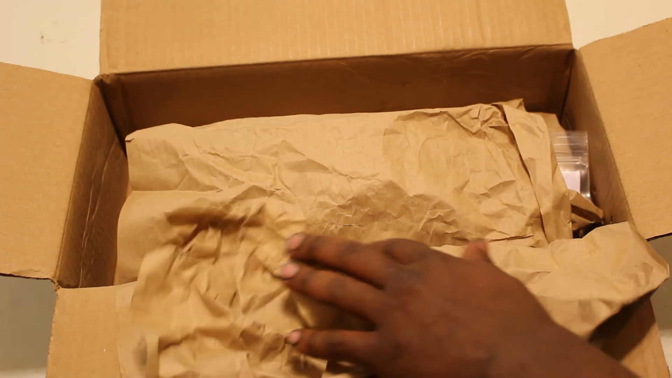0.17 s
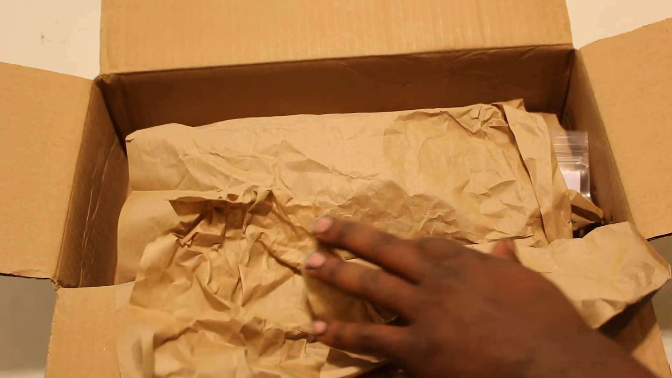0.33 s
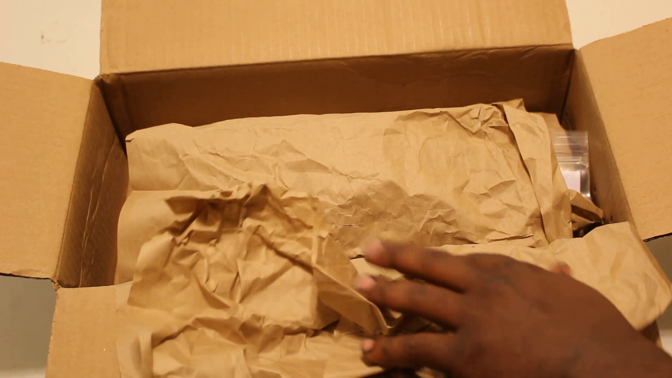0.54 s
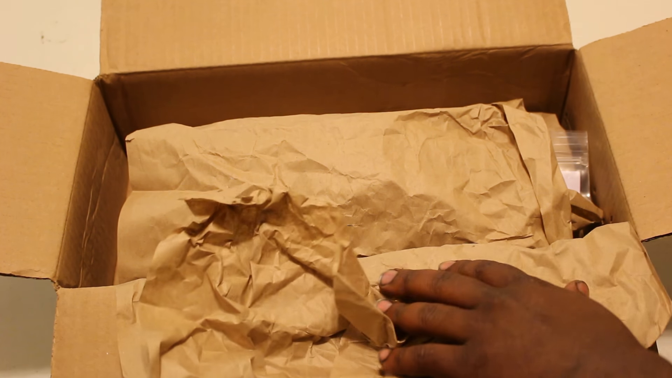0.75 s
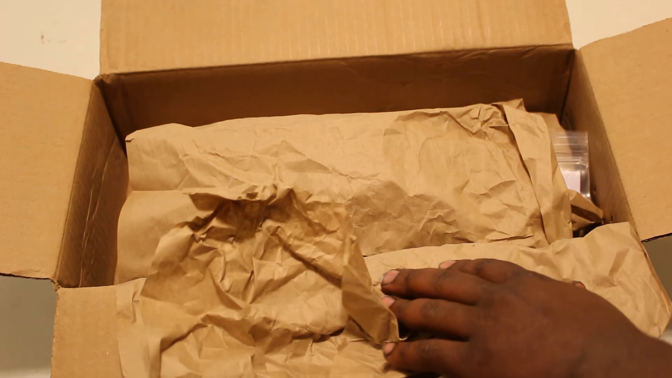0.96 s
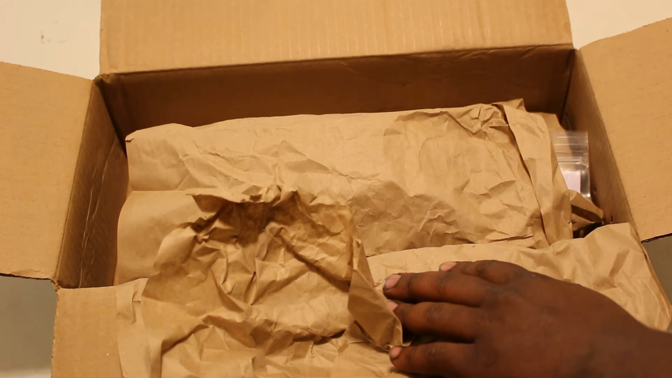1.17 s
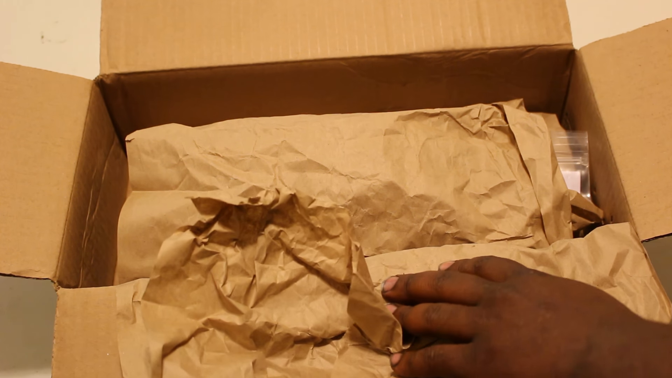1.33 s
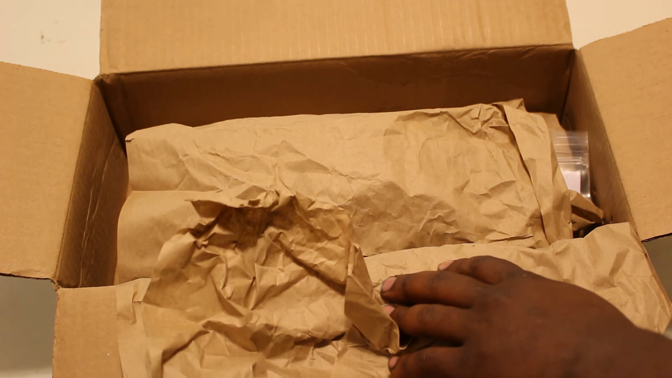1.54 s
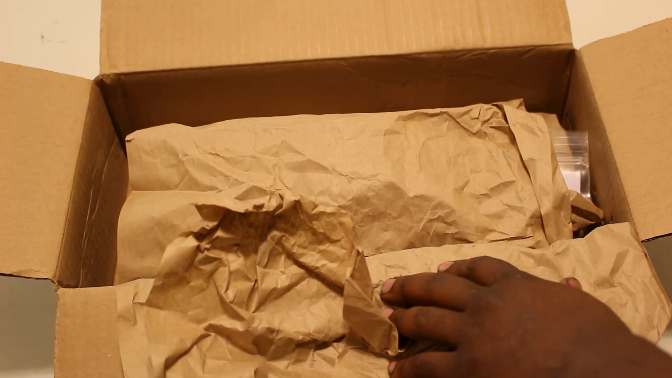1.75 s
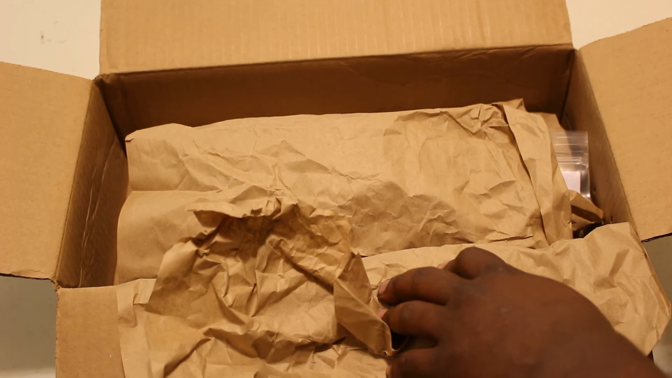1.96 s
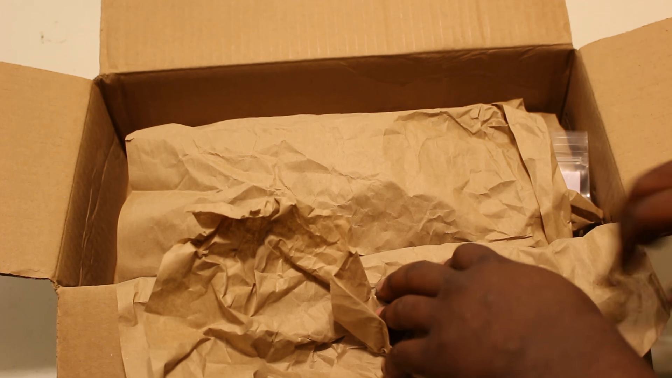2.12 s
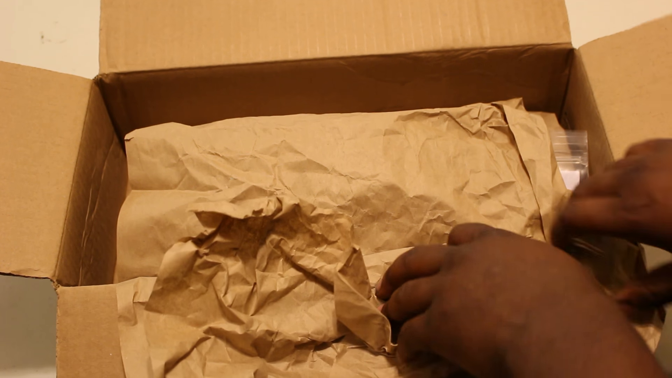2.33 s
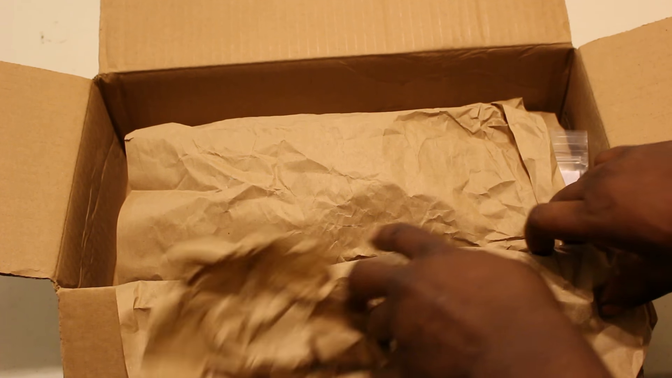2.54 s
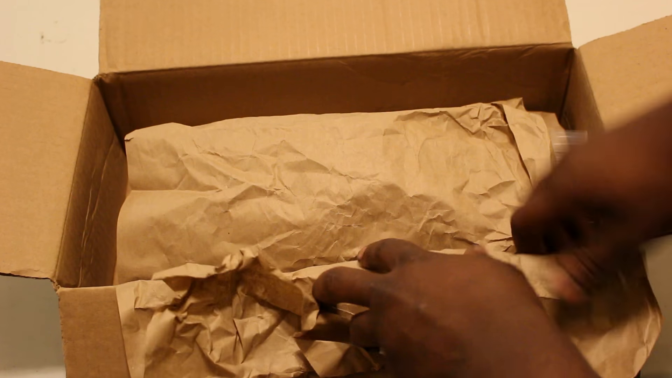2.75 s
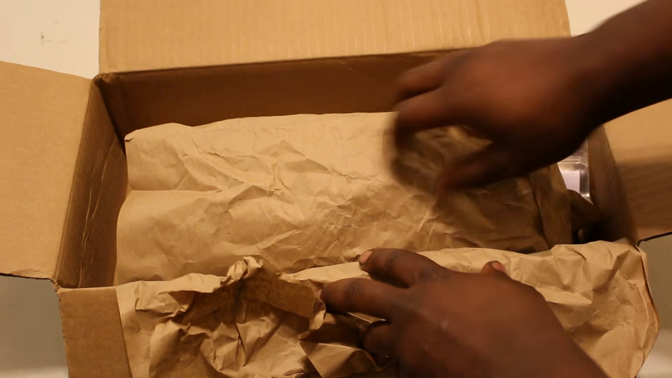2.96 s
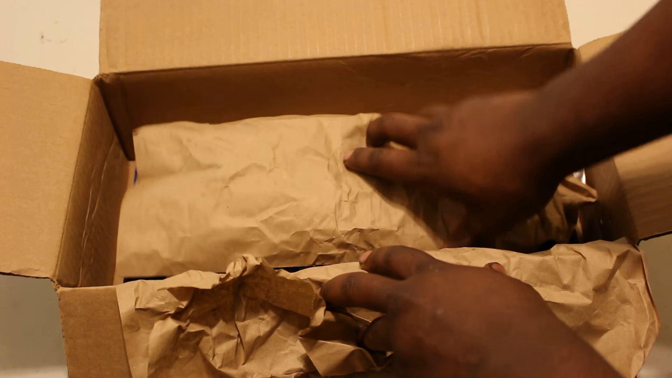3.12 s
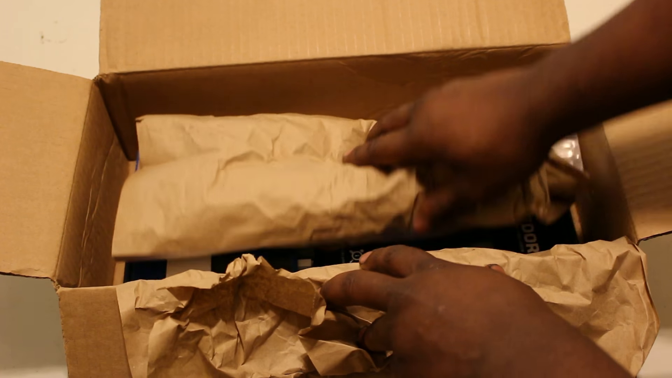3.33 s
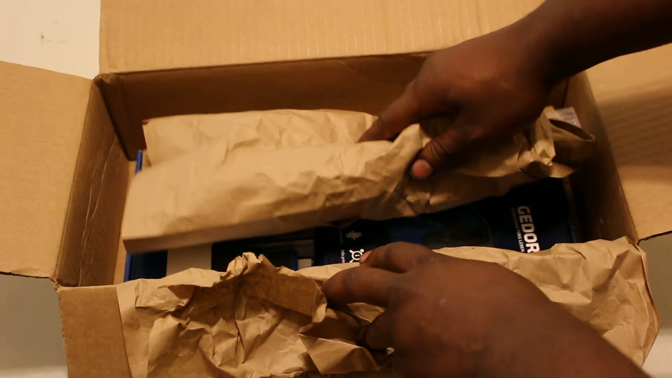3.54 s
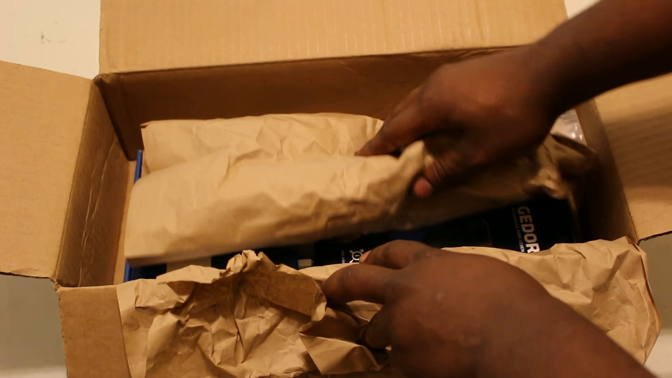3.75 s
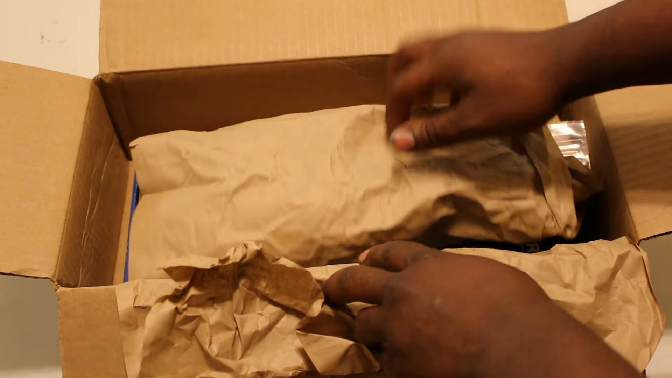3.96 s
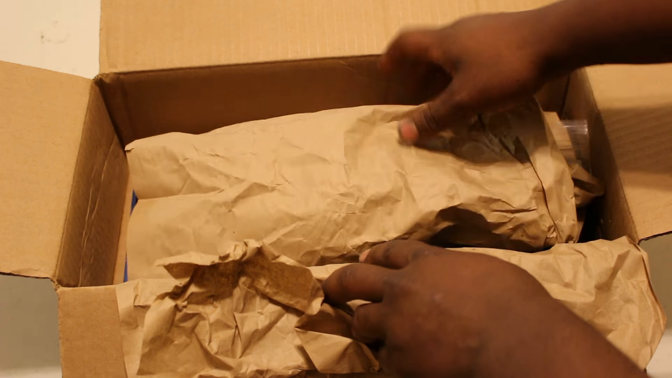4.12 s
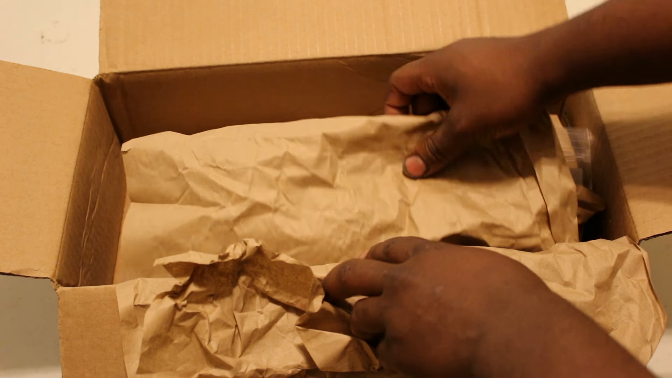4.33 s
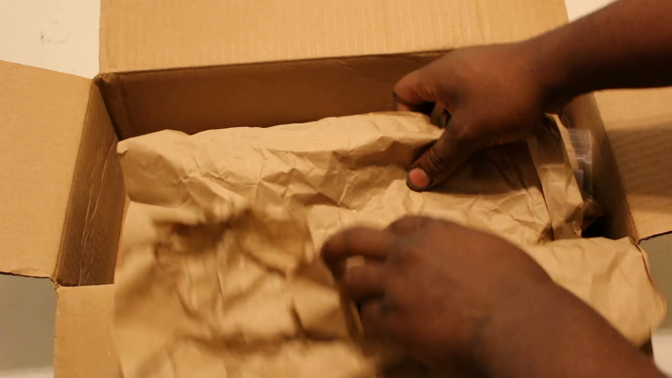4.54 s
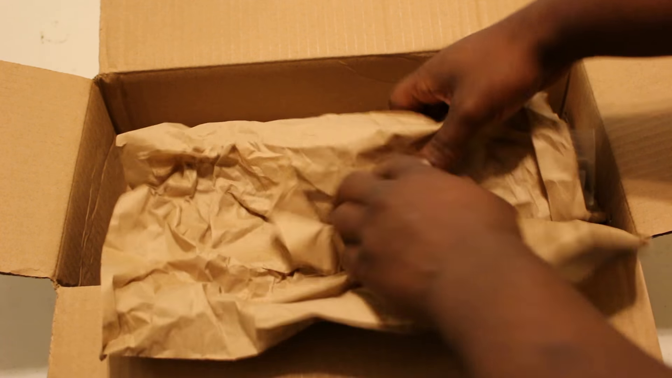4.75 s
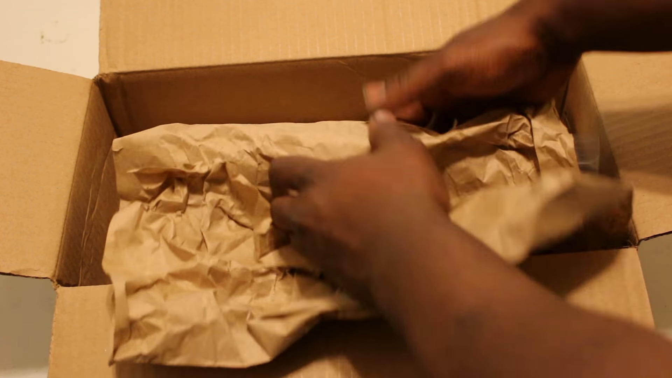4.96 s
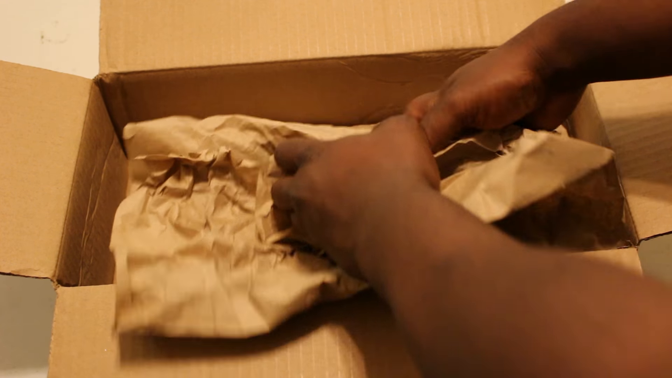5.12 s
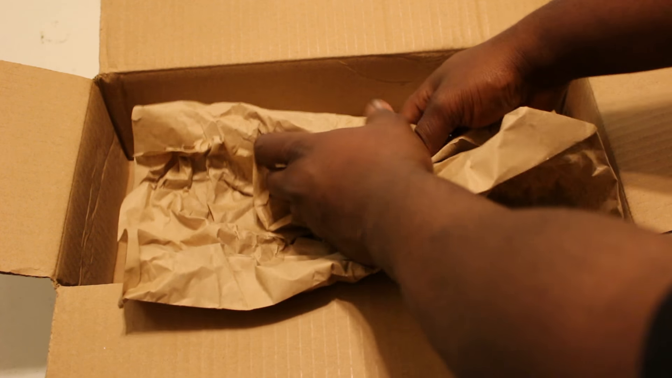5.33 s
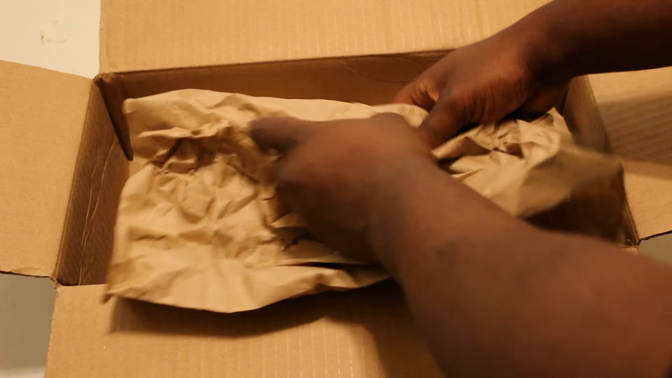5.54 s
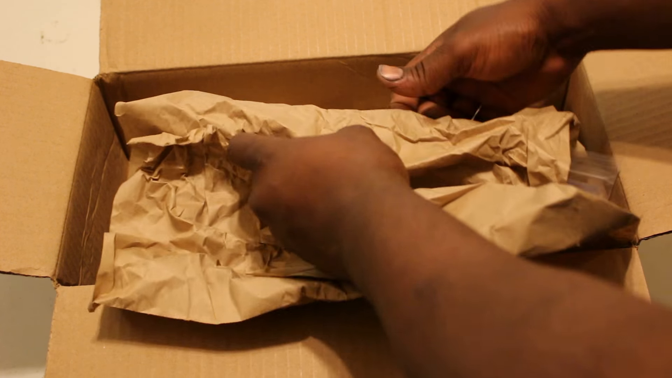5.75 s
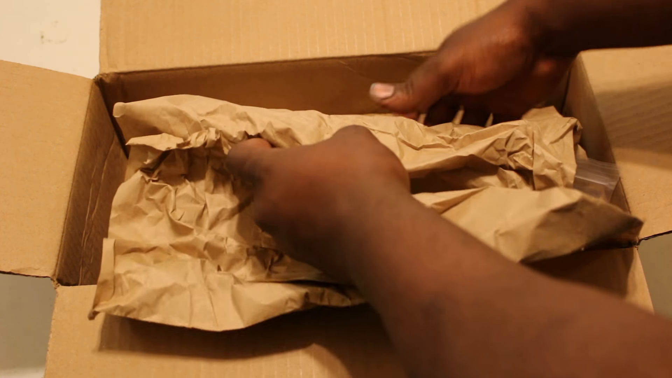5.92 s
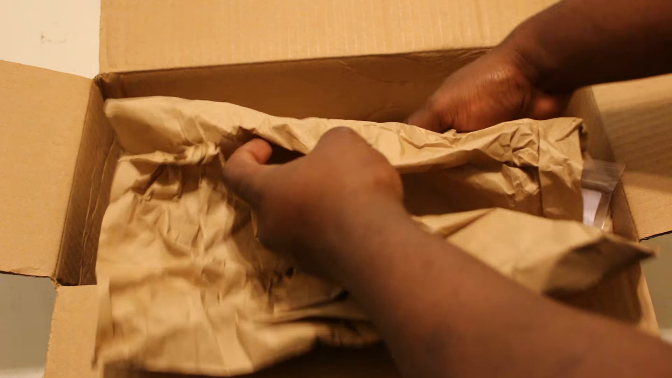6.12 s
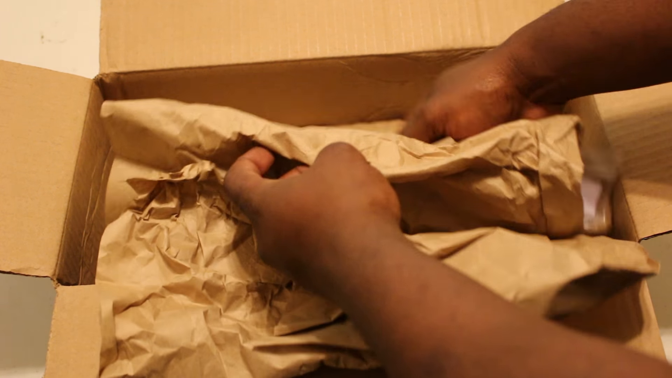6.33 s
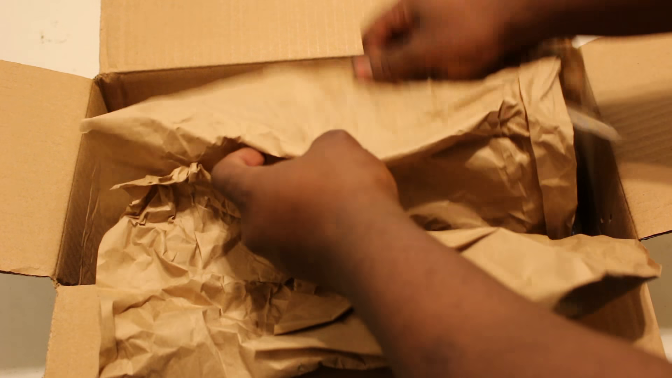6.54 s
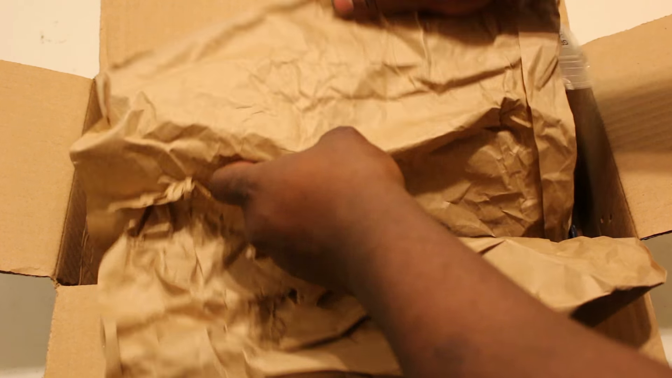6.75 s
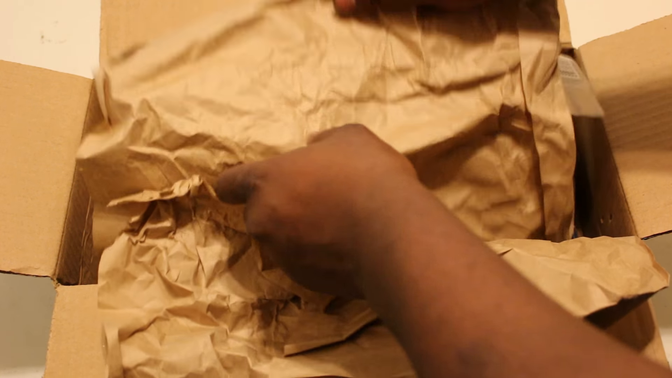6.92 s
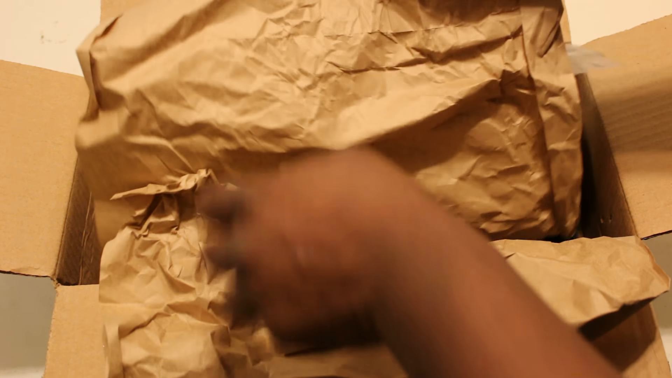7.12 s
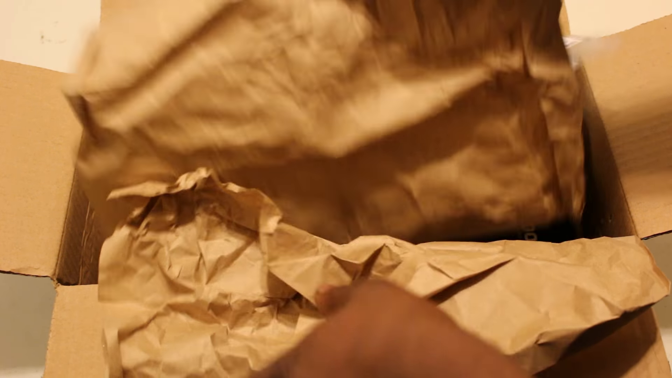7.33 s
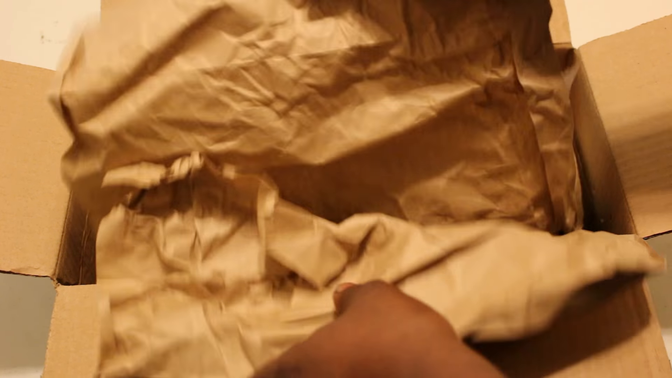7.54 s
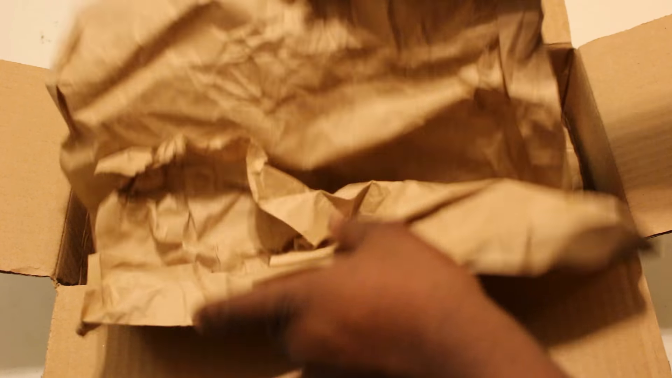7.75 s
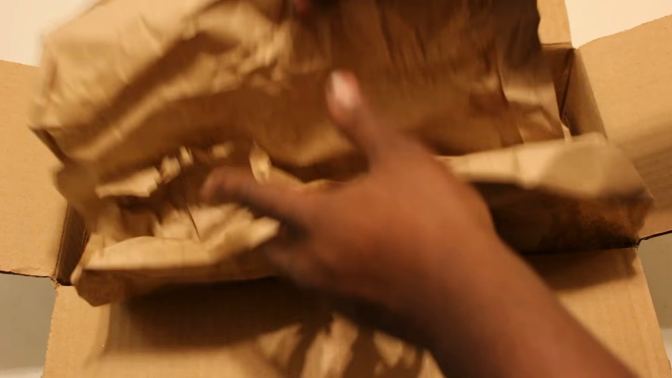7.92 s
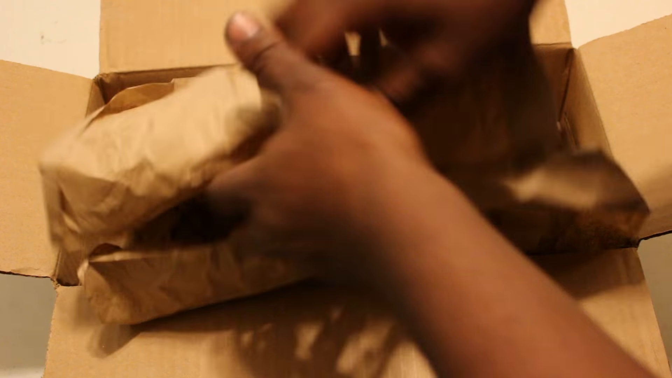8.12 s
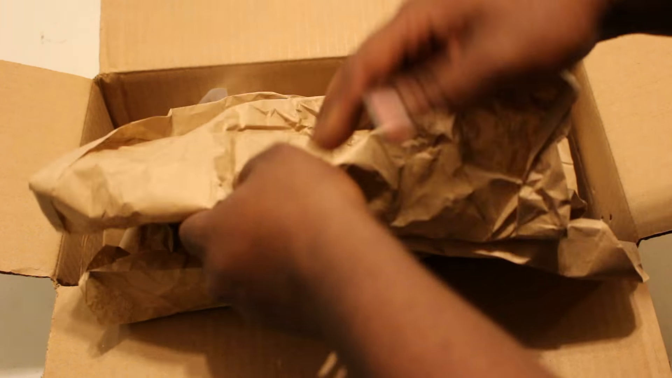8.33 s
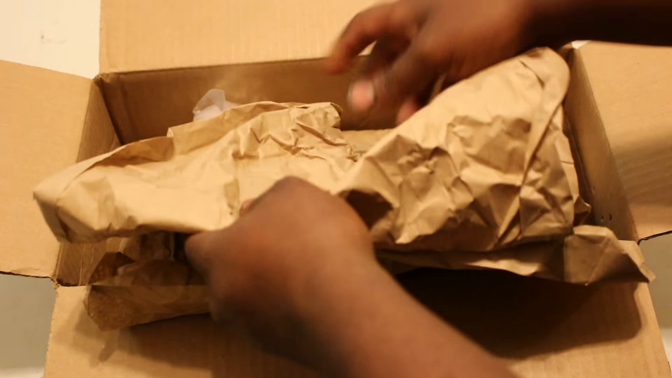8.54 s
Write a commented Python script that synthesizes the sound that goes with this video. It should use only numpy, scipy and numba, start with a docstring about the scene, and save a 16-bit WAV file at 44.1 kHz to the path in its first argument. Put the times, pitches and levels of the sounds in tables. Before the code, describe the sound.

Hands crumple heavy brown paper in a cardboard box: light crinkles, a sudden hollow knock, then dense, bright, snapping rustle to the end.

```python
"""Stiff packing paper is crumpled and pulled by hand in a cardboard box, close to the microphone.
Creases ring the paper facets as damped sines, sliding sheets hiss as noise, and big panels pop low.
Something drops against the box: its modes ring with a thump, the contents rattle and the box scrapes.
Around it a small furnished room adds a diffuse tail, quiet shaped noise and a thin screen whistle."""
import sys
import numpy as np
from scipy import signal
from scipy.fft import rfft, irfft, next_fast_len
from scipy.io import wavfile
from scipy.ndimage import uniform_filter1d
from numba import njit

SR = 44100
rng = np.random.default_rng(int(sys.argv[2]) if len(sys.argv) > 2 else 0)


def persist_wave(psi):
    """Save psi, clipped to +-1, as 16-bit WAV."""
    counts = np.round(np.clip(psi, -1, 1) * 32767).astype(np.int16)
    wavfile.write(sys.argv[1], SR, np.atleast_2d(counts).T)


N = 378378  # length [samples]

# hand strokes on the paper, close to the microphone: (loudest at [s], relative crackle level [dB],
# time to swell 10 dB [s], time to fade 10 dB [s], big panels minus crackle [dB])
STROKES = [(0.0, -37.5, 0.02, 0.04, -6.0), (0.051, -34.0, 0.014, 0.093, -9.0),
           (0.139, -37.0, 0.057, 0.06, -7.0), (0.248, -39.0, 0.019, 0.076, -5.5),
           (0.4, -46.0, 0.062, 0.09, -5.0), (0.46, -35.0, 0.008, 0.075, -5.0),
           (0.53, -37.0, 0.048, 0.104, -6.5), (0.642, -31, 0.008, 0.08, -8),
           (0.818, -48.0, 0.107, 0.062, -4.0), (0.99, -45.5, 0.004, 0.051, -4.5),
           (1.067, -50.0, 0.017, 0.095, -5.0), (1.191, -50.0, 0.076, 0.081, -3.5),
           (1.337, -49.0, 0.026, 0.12, -1.5), (1.84, -48, 0.07, 0.082, -4.0),
           (1.918, -46, 0.006, 0.09, -4.5), (2.312, -36, 0.008, 0.06, -4.5), (2.36, -33, 0.03, 0.09, -5),
           (2.481, -38.0, 0.085, 0.063, -4.0), (2.562, -35.5, 0.05, 0.062, -5.5),
           (2.649, -27.0, 0.063, 0.08, -9.5), (2.772, -36.0, 0.067, 0.054, -5.5),
           (2.859, -35.5, 0.014, 0.08, -7.0), (2.98, -37.5, 0.006, 0.06, -7.5),
           (3.084, -26.0, 0.025, 0.065, -5.0), (3.173, -31.5, 0.054, 0.12, -4.0),
           (3.321, -28.0, 0.126, 0.133, -5.0), (3.455, -31.5, 0.099, 0.109, -1.0),
           (3.556, -28.5, 0.129, 0.111, -5.0), (3.705, -38.0, 0.089, 0.12, -6.0),
           (3.848, -34.0, 0.021, 0.127, -5.5), (3.981, -32.0, 0.11, 0.144, -3.5),
           (4.147, -38.5, 0.107, 0.05, 1.5), (4.243, -32.5, 0.009, 0.091, -4.0),
           (4.35, -31.5, 0.023, 0.223, -3.0), (4.599, -31.5, 0.177, 0.228, -5.5),
           (4.918, -27.0, 0.15, 0.073, -5.5), (4.995, -26.5, 0.074, 0.195, -5.5),
           (5.273, -23.5, 0.169, 0.177, -6.5), (5.517, -27.0, 0.134, 0.128, -5.5),
           (5.654, -28.0, 0.101, 0.105, -5.0), (5.771, -28.0, 0.082, 0.064, -5.0),
           (5.856, -33.5, 0.023, 0.093, -4.0), (5.92, -34.0, 0.058, 0.065, -3.5),
           (6.065, -34.5, 0.066, 0.055, -4.5), (6.13, -30.5, 0.073, 0.083, -6.0),
           (6.228, -27.5, 0.08, 0.157, -7.0), (6.473, -25.0, 0.113, 0.185, -7.0),
           (6.663, -31.5, 0.141, 0.078, -6.0), (6.806, -34.0, 0.067, 0.078, -5.0),
           (6.877, -32.0, 0.078, 0.071, -6.0), (7.006, -32.5, 0.067, 0.073, -5.5),
           (7.113, -35.5, 0.014, 0.1, -5.0), (7.277, -34.0, 0.105, 0.109, -5.5),
           (7.439, -29.5, 0.105, 0.13, -6.0), (7.596, -29.0, 0.127, 0.153, -6.5),
           (7.781, -29.0, 0.132, 0.124, -4.5), (7.936, -30.0, 0.095, 0.157, -5.0),
           (8.18, -33, 0.16, 0.1, -6.5), (8.29, -25.5, 0.1, 0.13, -7.0), (8.399, -33.5, 0.086, 0.135, -7.5),
           (8.576, -33.0, 0.115, 0.1, -6.5)]
# the sheet settling under resting hands: (relative crackle level [dB], big panels minus crackle [dB])
REST = (-62.5, 3.7)
# treble of the rustle, rising and falling: (time [s], level [dB])
TREBLE = [(0, 0), (.9, 6), (2.1, 4), (2.6, 2), (3.1, 0), (3.6, 3), (4.3, 3), (4.6, 3), (4.77, -4), (4.9, 3),
          (5.3, 0.5), (5.9, 1), (6.55, 5), (7.2, 2), (8.58, 3)]
FINE_DB = 4.4  # fine creases minus crackle, for a stroke at 0 dB
FINE_PER_DB = 0.4  # how much brighter each dB of pull makes the fine creases [dB]


def rustle():
    """Random creases over sliding hiss; each stroke moves its own mix of big panels and fine creases."""
    t = np.arange(0, N / SR + .001, .001)  # control times, 1 ms apart [s]
    clock = np.arange(N) / SR
    moves = [(REST[0] + 0 * t, REST[1])]
    moves += [(swell(t, *row[:4]), row[4]) for row in STROKES]
    mid_power = sum(undb(db) ** 2 for db, _ in moves)
    panel_power = sum(undb(db + panel_db) ** 2 for db, panel_db in moves)
    # strong pulls snap finer creases, so loud strokes are brighter
    fine_power = sum(undb(db + FINE_DB + FINE_PER_DB * db) ** 2 for db, _ in moves)
    mid_gain, panel_gain, fine_gain = (
        np.interp(clock, t, np.sqrt(power)) for power in (mid_power, panel_power, fine_power))
    fine_gain = fine_gain * undb(np.interp(clock, *np.transpose(TREBLE)))

    slide = noise(PAPER) * undb(1.75 * walk(60))  # sheets catch and let go
    panels = crackle(count=1800, spread_db=3.2, cycles=12, lo_hz=180, hi_hz=900)
    panels += level(band(slide, 180, 900), -1)
    creases = crackle(count=11000, spread_db=3.9, cycles=11, lo_hz=800, hi_hz=15000)
    creases += level(band(slide, 800, 16000), -2.2)
    fine = high_pass(creases, 5500)
    mix = undb(-1.35) * panel_gain * panels
    mix += undb(-2.5) * mid_gain * (creases - fine) + fine_gain * fine
    return np.interp(clock, t, hush(t)) * mix


# spectrum of the paper: (frequency [Hz], level per Hz [dB])
PAPER = [(150, -30), (224, -21), (365, 0.5), (595, 5.5), (784, 1), (1650, -4), (5770, -11.5),
         (10500, -20.5), (16000, -32)]


def crackle(count, spread_db, cycles, lo_hz, hi_hz):
    """Each crease rings four facets around a pitch of its own; sizes have a long tail, so a few stand out."""
    when, luck, side, pitch = rng.random((4, count, 1))
    detune, late = rng.random((2, count, 4))
    hz = lo_hz * (hi_hz / lo_hz) ** (0.548 * pitch + 0.4496 * detune)
    size_db = -spread_db * np.log(1 - .99 * luck) + shape(PAPER, hz)
    size = undb(size_db) * hz ** 0.57 * np.sign(side - .5)
    s = when * (N / SR - .01) + .0015 * late ** 2
    t60 = cycles * (.5 + late) / hz + 0.00073  # later facets ring longer
    return level(ring(s, hz, t60, size), 0)


# loud creases close to the microphone: (time [s], relative level [dB], facet pitch [Hz],
# bright edge relative to that level [dB])
SNAPS = [(0.045, -14, 3020, -14), (0.0605, -10.5, 3000, -20), (0.127, -22, 1220, -29),
         (0.251, -20.5, 1480, -13), (0.458, -14, 1560, -12), (0.521, -17, 2900, -33),
         (0.588, -18, 2380, -22), (0.633, -10.5, 1120, -25), (0.648, -11.5, 3460, -13),
         (0.656, -11.5, 1380, -23), (0.9887, -24, 1400, -21), (1.0694, -33, 1350, -17),
         (1.341, -26.5, 940, -30), (1.709, -39, 4370, -4), (1.795, -27.5, 880, -17),
         (1.844, -29, 1520, -28), (1.9182, -22.5, 2280, -18), (1.945, -27, 2760, -22),
         (2.3014, -22.5, 2590, -23), (2.318, -13, 2430, -20), (2.355, -12, 1110, -32),
         (2.488, -17.5, 2400, -27), (2.553, -11, 3800, -22), (2.611, -12, 3500, -14),
         (2.615, -16, 1300, -13), (2.678, -14, 1420, -6), (2.8914, -11.5, 2100, -31),
         (2.9775, -12, 2240, -30), (3.059, -18.5, 1910, -10), (3.0729, -8.5, 2500, -15),
         (3.0877, -16, 2050, -1), (3.165, -24, 1180, -2), (3.254, -14, 1620, -18), (3.276, -10, 2000, -30),
         (3.435, -14, 3530, -17), (3.472, -10.5, 4600, -7), (3.538, -15, 3370, -28),
         (3.551, -11, 1950, -24), (3.563, -15.5, 1310, -4), (3.62, -7.5, 4960, -12),
         (3.7359, -12, 3460, -25), (3.767, -20, 3800, -18), (3.825, -26, 5000, -6), (3.8442, -5, 3800, -36),
         (3.972, -15, 4130, -11), (4.239, -13, 3400, -19), (4.2548, -18, 1880, -24),
         (4.347, -17.5, 1370, -5), (4.4203, -15, 1080, -18), (4.827, -10, 3030, -25),
         (4.8835, -9.5, 1290, -24.5), (4.9113, -7.5, 1250, -8.5), (4.9595, -12, 1000, -18),
         (5.018, -9, 4000, -9), (5.057, -15, 1820, -14), (5.095, -12, 2290, -8), (5.25, -9, 1740, -23),
         (5.431, -19, 2330, -28), (5.479, -14, 1170, -29), (5.4993, -8, 1120, -33.5),
         (5.657, -5, 2580, -25), (5.686, -19, 1680, -6), (5.859, -19, 1240, -21.5),
         (5.9195, -13.5, 1900, -26), (6.2224, -13, 1680, -5), (6.2828, -16.5, 1480, -6),
         (6.3184, -15, 1820, -10), (6.4136, -16.5, 875, -6), (6.4621, -8, 1380, -25), (6.573, -20, 1500, 1),
         (6.8728, -13.5, 2940, -18), (7.113, -19.5, 1440, -24.5), (7.522, -10.5, 3100, -7),
         (7.586, -19, 1100, -25), (7.693, -12.5, 2760, -30), (7.769, -19, 1160, -30),
         (7.9182, -16.5, 1490, -17), (8.0465, -11, 3040, -10), (8.108, -11.5, 2830, -8),
         (8.1727, -14, 1710, -5), (8.2315, -10.5, 2300, -14), (8.2612, -8, 2800, -24),
         (8.2881, -7, 1820, -25), (8.36, -19, 5500, -7), (8.3926, -12, 3100, -23), (8.4482, -21, 2500, -25)]


def snaps():
    """Loud creases: a facet rings, a bright edge clicks, then neighbours give way in a dying run."""
    s, db, hz, edge_db = np.transpose(SNAPS)
    facet = ring(s, hz, 9 / hz, undb(db - 4.0))
    edge = bursts(s, undb(db + edge_db - 2.5), 0.01) * level(band(noise(PAPER), 3300, 15000), 0)

    delay, detune, size = rng.standard_normal((3, len(s), 16))  # 16 neighbours per crease
    late = .002 * delay ** 2
    near_hz = hz[:, None] * 2 ** (0.47 + 0.594 * detune)
    near_db = db[:, None] - 12 - 1000 * late  # 1 dB weaker per ms of delay
    near_db -= 9 * np.log2(np.maximum(near_hz / 4500, 1))  # weaker still above 4500 Hz
    near = ring(s[:, None] + late, near_hz, 11 / near_hz, undb(near_db) * size)
    return facet + edge + near


HUSH_DB, HUSH_S = -0.5, 0.012  # depth per crease [dB], time constant [s]


def hush(t):
    """Gain of the rustle: the sheet tightens and quietens just before a loud crease gives."""
    ahead = np.array(SNAPS)[:, :1] - t
    tension = np.exp(-np.maximum(ahead, 0) / HUSH_S) * (ahead > 0)
    return undb(HUSH_DB * np.sum(tension, axis=0))


# big panels buckling: (start of the give [s], relative level [dB], pitch [Hz])
POPS = [(0.456, -19, 553), (2.298, -30, 342), (3.072, -19.5, 480), (3.221, -15, 500), (3.456, -5.5, 567),
        (3.547, -12, 664), (3.998, -24, 560), (4.033, -22.5, 454), (4.142, -20, 243), (4.415, -17.5, 350),
        (4.907, -17, 420), (4.957, -13, 600), (5.441, -16, 610), (5.628, -15.5, 580), (5.76, -17, 305),
        (6.44, -16, 364), (6.87, -20, 500), (7.587, -16, 510), (8.178, -19.5, 322), (8.271, -16, 290)]


def pops():
    """Large panels flip with a few low cycles, a moment after they start to give."""
    s, db, hz = np.transpose(POPS)
    low = ring(s + 0.0032, hz, 14 / hz, undb(db - 3.0))
    overtone = ring(s + 0.00285, 1.48 * hz, 8 / hz, undb(db - 9.5))
    return low + overtone


# blows on the box: (time [s], relative level [dB], hardness [dB])
BLOWS = [(1.3832, -8, -6), (1.3906, -10.5, -6), (1.4102, -4, -2), (1.415, -13, 1), (1.4248, -10.5, 7),
         (1.4455, -14, -10), (1.595, -25, -16), (1.624, -27, -29)]
# modes of box and contents: (frequency [Hz], level [dB], time to fall 60 dB [s])
BOX = [(107, -20, 0.42), (136, -17.5, 0.25), (183.5, -11.5, 0.14), (220, -12.5, 0.15), (291, -8.5, 0.091),
       (329.5, -0.5, 0.081), (402, -3.5, 0.068), (517, -7.5, 0.066), (657, -8.5, 0.069), (821, -9.5, 0.038),
       (1380, -20, 0.035), (1720, -19, 0.029), (2620, -10, 0.019), (2984, -6, 0.03), (3320, -8.5, 0.033),
       (5630, -18, 0.012)]
# the walls give briefly under each blow: (frequency [Hz], level [dB], time to fall 60 dB [s])
THUD = [(150, -9, 0.042), (426, 7, .012)]
CRACK_DB, CRACK_T60_S = -11, 0.011  # bright crack relative to blow plus hardness, and its decay


def blows():
    """Each blow rings the box modes, the upper ones by its hardness, over a short thud and a bright crack."""
    s, db, hard_db = (column[:, None] for column in np.transpose(BLOWS))
    hz, mode_db, t60 = np.transpose(BOX)
    # low neighbours swing opposite ways; the high modes take a new sign at each blow
    alternate = -(-1) ** np.arange(len(hz))
    side = np.where(hz > 1000, rng.choice([-1, 1], (len(s), len(hz))), alternate)
    upper = np.clip(np.log2(hz / 420), 0, 1)
    modes = ring(s, hz, t60, side * undb(db + mode_db + hard_db * upper))

    thud_hz, thud_db, thud_t60 = np.transpose(THUD)
    thud = ring(s, thud_hz, thud_t60, undb(db + thud_db))
    crack = bursts(s[:, 0], undb(db + hard_db + CRACK_DB)[:, 0], CRACK_T60_S)
    return modes + thud + crack * level(band(noise(PAPER), 2500, 12000), 0)


# contents rattling from the first blow on, then settling: (loudest at [s], relative level [dB],
# time to swell 10 dB [s], time to fade 10 dB [s])
RATTLE = [(1.41, -24, .06, .055), (1.58, -41, 1, .09)]
# spectrum of the rattling hiss: (frequency [Hz], level per Hz [dB])
RATTLE_COLOUR = [(200, 6), (1200, 0.5), (2200, -4), (3100, -3.5), (4100, -9), (5600, -6),
                 (9000, -23.5), (16000, -37)]
SHIFT = 0.028  # share by which the modes move as the contents shift (standard deviation)


def rattle():
    """Tumbling contents knock the box modes with new weights and pitches each time, over a rattling hiss."""
    first = BLOWS[0][0]
    hz, mode_db, t60 = np.transpose(BOX)
    knocks = first + rng.uniform(0, .34, (90, 1))
    knock_db = np.maximum(*(swell(knocks, *row) for row in RATTLE)) + 2.0 + mode_db
    knock_db = knock_db - 1.3 * (hz < 250) - 4 * (hz > 1000)
    detune, weight = rng.standard_normal((2, len(knocks), len(hz)))
    tumble = ring(knocks, hz * (1 + SHIFT * detune), t60, undb(knock_db) * weight)

    t = np.arange(N) / SR
    hiss_gain = sum(undb(swell(t, *row)) for row in RATTLE) * (t > first)
    return tumble + hiss_gain * noise(RATTLE_COLOUR)


# the box shoved over the table: (loudest at [s], relative level [dB],
# time to swell 10 dB [s], time to fade 10 dB [s])
SCRAPE = [(.714, -36, .008, .08), (.79, -37, .08, .055)]


def scrape():
    """Box sliding on the table: random stick-slip kicks, about 3000 a second, kept to the low band."""
    t = np.arange(N) / SR
    kicks = rng.standard_normal(N) * (rng.random(N) < 3000 / SR)
    return sum(undb(swell(t, *row)) for row in SCRAPE) * level(band(kicks, 83, 290), 0)


def box():
    """Everything the cardboard box sounds, without its deepest bass."""
    return high_pass(blows() + rattle() + scrape(), 80)


def walls(x, t60=.25, wet_db=-13):
    """Small furnished room: a diffuse tail of decaying noise, starting 4 ms after the direct sound."""
    t = np.arange(int(.5 * SR)) / SR
    tail = band(rng.standard_normal(len(t)), 46, 6000) * np.exp(-np.log(1000) * t / t60) * (t > .004)
    tail /= np.sqrt(np.sum(tail ** 2))
    return x + undb(wet_db) * signal.fftconvolve(x, tail)[:N]


# spectrum of the quiet room: (frequency [Hz], level per Hz [dB])
ROOM = [(25, -4), (112, -4.5), (265, -8), (366, -4), (644, -14), (798, -11.5), (2600, -22), (13700, -35),
        (15300, -51)]


def room_tone():
    """The quiet room: steady noise, strongest in the bass."""
    return level(noise(ROOM), -51)


# thin screen whistle: (frequency [Hz], rms level ahead of the microphone chain [dB])
WHISTLE = [(15734, -74)]


def whistle():
    """The screen's whistle: a steady, very high sine."""
    t = np.arange(N) / SR
    return sum(undb(db) * np.sqrt(2) * np.sin(2 * np.pi * hz * t) for hz, db in WHISTLE)


def undb(db):
    """Decibels to gain."""
    return 10 ** (np.asarray(db) / 20)


def level(x, db):
    """Scale to an rms level."""
    return x * undb(db) / np.sqrt(np.mean(x ** 2))


def shape(table, hz):
    """dB of a spectrum at the given frequencies, interpolated over log frequency."""
    f, db = np.transpose(table)
    return np.interp(np.log(np.maximum(hz, 1)), np.log(f), db)


def noise(table):
    """Noise with the given spectrum, rms 1."""
    size = next_fast_len(N)
    gain = undb(shape(table, np.arange(size // 2 + 1) * SR / size))
    return level(irfft(rfft(rng.standard_normal(size)) * gain, size)[:N], 0)


def band(x, lo_hz, hi_hz):
    """Band-pass."""
    return signal.sosfilt(signal.butter(2, [lo_hz, hi_hz], "bandpass", fs=SR, output="sos"), x)


def high_pass(x, hz, order=2):
    """Keep what lies above a frequency."""
    return signal.sosfilt(signal.butter(order, hz, "highpass", fs=SR, output="sos"), x)


@njit
def rings(length, start, hz, t60, size, sr):
    """Sum of damped sines, each from its own sample until it has fallen 60 dB."""
    out = np.zeros(length)
    for k in range(len(start)):
        turn = np.exp(2j * np.pi * hz[k] / sr - np.log(1000) / (t60[k] * sr))
        z = size[k] + 0j
        for i in range(start[k], min(length, start[k] + int(t60[k] * sr))):
            out[i] += z.imag
            z *= turn
    return out


def ring(s, hz, t60, size):
    """Damped sines at times in seconds."""
    s, hz, t60, size = (1. * a.ravel() for a in np.broadcast_arrays(s, hz, t60, size))
    return rings(N, (s * SR).astype(np.int64), np.clip(hz, 20, .45 * SR), t60, size, 1. * SR)


def bursts(s, size, t60):
    """Envelope of sharp bursts that die away."""
    kicks = np.zeros(N)
    np.add.at(kicks, (np.asarray(s) * SR).astype(int), size)
    return signal.lfilter([1], [1, -np.exp(-np.log(1000) / (t60 * SR))], kicks)


def walk(rate):
    """Random levels, rate of them a second, slewed from one to the next; spread near 1."""
    k = int(SR / rate)
    held = np.repeat(rng.standard_normal(N // k + 1), k)
    return 1.4 * uniform_filter1d(held, k)[:N]


ROUNDING = 1.5  # 1 = pointed peaks, more = broader tops and steeper flanks


def swell(t, peak_s, db, rise_s, fall_s):
    """Level in dB that climbs to a peak and fades, 10 dB down at rise_s before and fall_s after it."""
    before = (peak_s - t) / max(rise_s, .001)
    after = (t - peak_s) / max(fall_s, .001)
    return db - 10 * np.maximum(before, after) ** ROUNDING


def scene():
    """Paper and box in the small room; thin sheets radiate no bass."""
    sheets = high_pass(rustle() + snaps() + pops(), 200, order=4)
    return (walls(sheets + box()) + room_tone() + whistle())[None]


def record(dry):
    """Microphone chain: loud peaks are rounded; the deep bass and the top are cut."""
    x = high_pass(np.tanh(0.81 * dry) / 0.79, 75, order=3)
    return signal.sosfilt(signal.ellip(10, .2, 80, 16050, fs=SR, output="sos"), x)


dry = scene()
out = record(dry)
persist_wave(out)
```